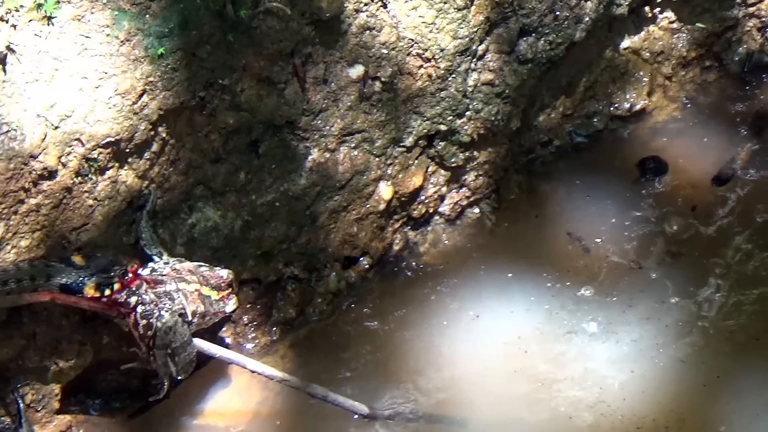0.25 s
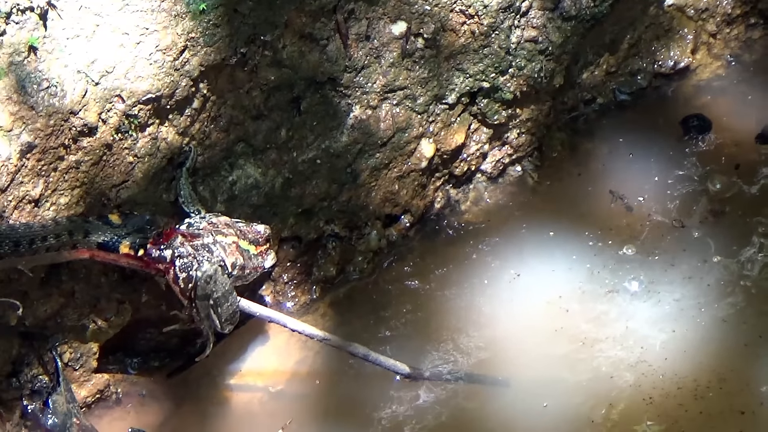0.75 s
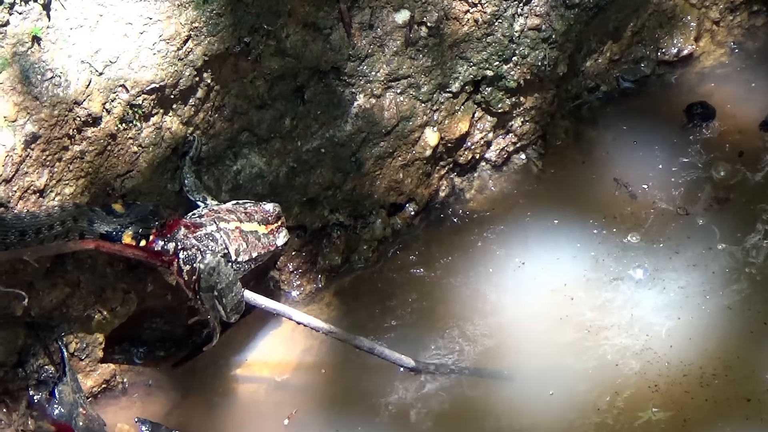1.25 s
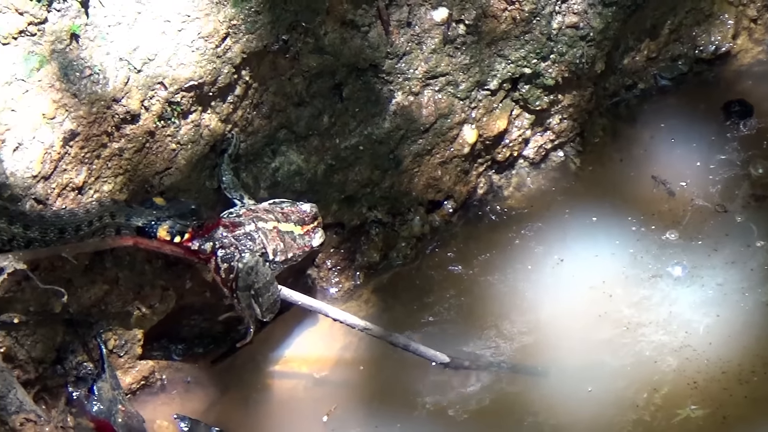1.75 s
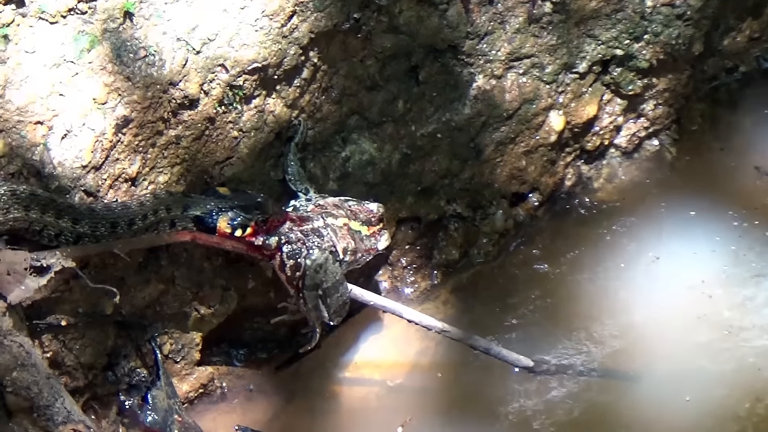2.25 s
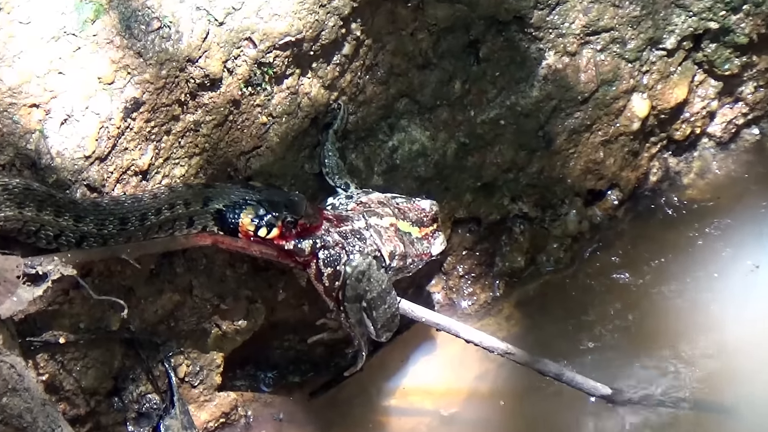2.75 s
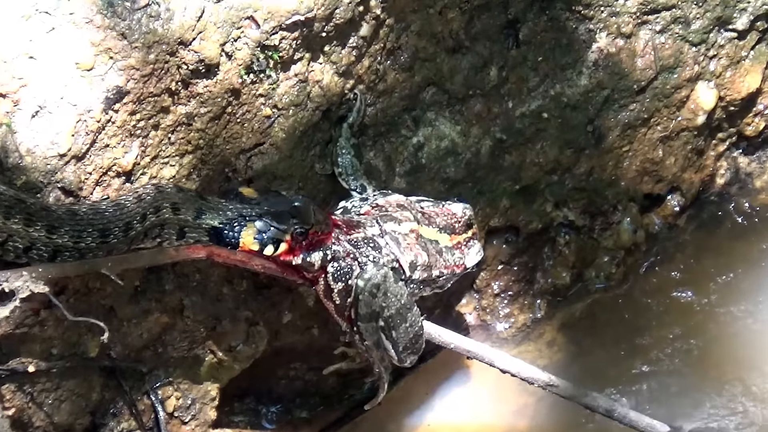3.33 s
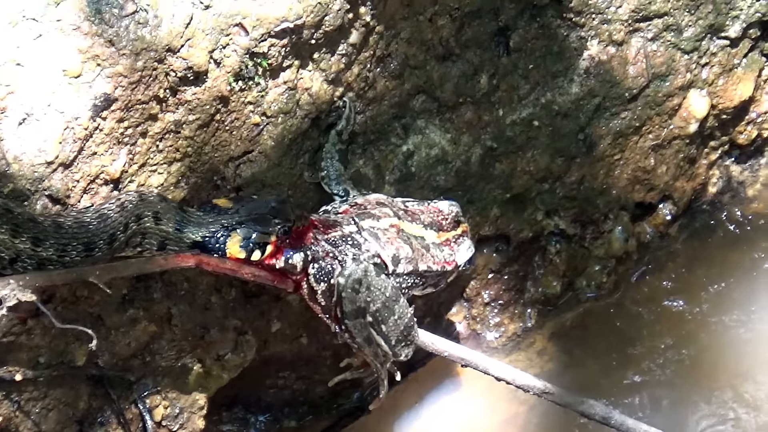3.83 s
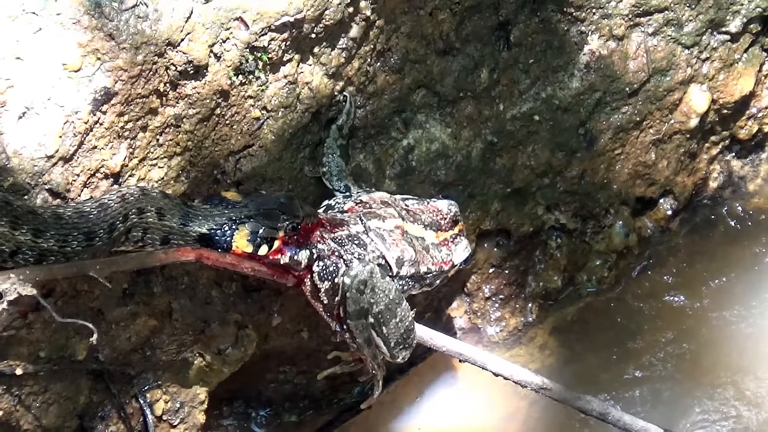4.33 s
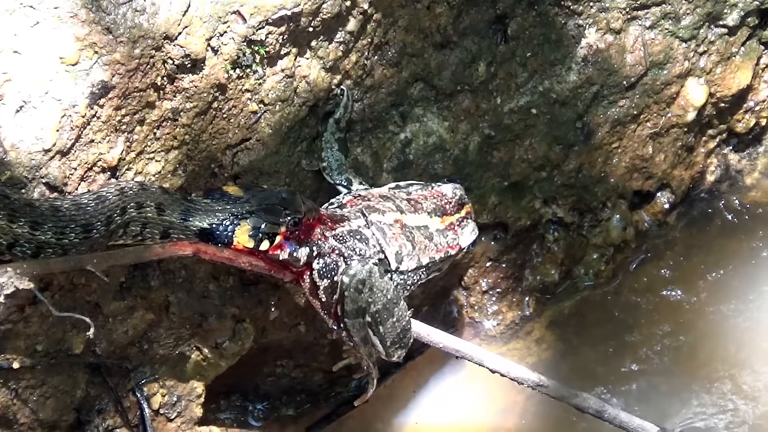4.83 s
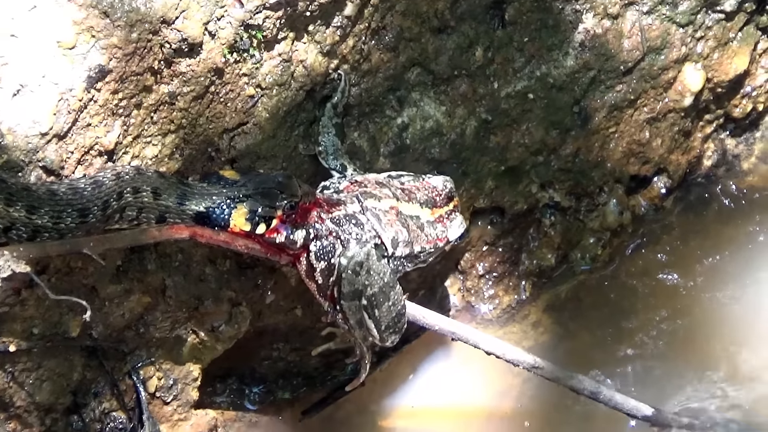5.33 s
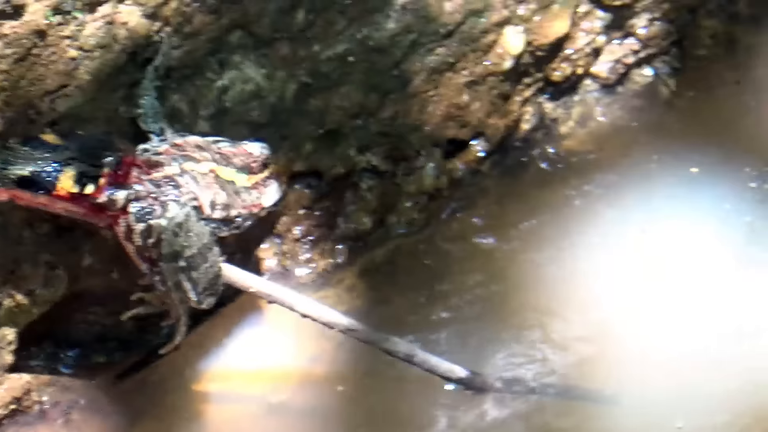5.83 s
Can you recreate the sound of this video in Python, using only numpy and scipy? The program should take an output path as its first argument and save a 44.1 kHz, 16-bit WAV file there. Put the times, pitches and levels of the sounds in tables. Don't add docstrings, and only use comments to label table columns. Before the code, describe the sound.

Two short, rasping frog cries over soft woodland hiss and far road drone, a few dry rustles, then loud finger clicks on the camera.

```python
import sys
import numpy as np
from scipy import signal
from scipy.fft import irfft
from scipy.io import wavfile

SR = 44100
rng = np.random.default_rng(int(sys.argv[2]) if len(sys.argv) > 2 else 0)


def store_pcm(level_fs):
    pcm = np.round(np.clip(level_fs, -1, 1) * 32767).astype(np.int16)
    wavfile.write(sys.argv[1], SR, np.atleast_2d(pcm).T)


def gain_from_decibels(decibels):
    exponent = np.asarray(decibels, float) / 20
    return 10 ** exponent


N = 268304
TIME = np.arange(N) / SR


def rms_one(x):
    return x / np.sqrt(np.mean(x ** 2) + 1e-20)


def at_hz(points, hz):
    points_hz, values = np.transpose(points)
    return np.interp(np.log(hz), np.log(points_hz), values)


def drift(rate_hz):
    r = np.exp(-80 * np.pi * rate_hz / SR)
    white = rng.standard_normal(N // 40 + 2002)
    slow = signal.lfilter([1], [1, -2 * r, r * r], white)[2000:]
    return np.interp(np.arange(N) / 40, np.arange(len(slow)), rms_one(slow))


def band(x, low_hz, high_hz, order=2):
    edges = [low_hz, min(high_hz, .45 * SR)]
    return signal.sosfilt(signal.butter(order, edges, "band", fs=SR, output="sos"), x)


def modes(table, hz):
    return sum(gain_from_decibels(db) * 1j * hz * width / (top ** 2 - hz ** 2 + 1j * hz * width) for top, width, db in table)


def add(out, s, sound):
    i = int(s * SR)
    out[..., i:i + sound.shape[-1]] += sound[..., :N - i]


# f/Hz, likeness/0..1
LIKENESS = [(60, 1.0), (130, 1.0), (290, 0.99), (640, 0.73), (1410, 0.44), (3100, 0.56), (6820, 0.77),
            (15000, 1.0)]


def banded_noise(spectrum, patchy_db, order):
    out, white = 0, rng.standard_normal((2, 2, N))
    edges = np.geomspace(spectrum[0][0], spectrum[-1][0], 18)
    for k, (low, high) in enumerate(zip(edges, edges[1:])):
        mid, side = band(white[k % 2], low, high, order=order)
        hz = np.sqrt(low * high)
        alike = np.clip(at_hz(LIKENESS, hz), 0, 1)
        gain = gain_from_decibels(at_hz(spectrum, hz) + patchy_db * drift(4.0))
        out = out + gain * (np.sqrt(1 + alike) * mid + np.sqrt(1 - alike) * side * [[1], [-1]])
    return rms_one(out)


# f/Hz, level/dB per Hz
HISS = [(400, -5.5), (650, 2), (1050, -0.5), (1500, -3.5), (3000, -6), (5500, -12.5), (7000, -14.5),
        (8700, -8.5), (10500, -19), (13000, -21.5), (16500, -19)]


def forest_hiss():
    start_db, fade_db_per_s = -57.5, 0.33
    top = signal.cheby2(16, 50, 16100, fs=SR, output="sos")
    hiss = signal.sosfilt(top, banded_noise(HISS, patchy_db=0.9, order=2))
    return gain_from_decibels(start_db - fade_db_per_s * TIME + np.array([[.35], [-.35]])) * hiss


def swells(rows):
    return sum(gain_from_decibels(db - 11.5 * ((TIME - s) / half) ** 2) for s, db, half in rows)


# f/Hz, level/dB per Hz
RUMBLE = [(20, -36), (60, -15), (105, -21.5), (125, -3.5), (165, 2), (250, -5.5), (340, -2.5), (420, -12.5),
          (520, -21)]
# t/s, level/dB
TRAFFIC = [(0.0, -55), (0.8, -62.5), (1.25, -55.5), (1.55, -59), (1.85, -54), (3.0, -58.5), (3.9, -60),
           (4.6, -57.5), (6.08, -60.5)]
# t/s, level/dB, half length/s
LOW_ENGINE = [(0.0, -61, 0.076), (1.37, -51, 0.13), (1.85, -47.5, 0.14), (2.3, -46, 0.33),
              (4.15, -57.5, 0.31), (5.72, -56, 0.069)]
HIGH_ENGINE = [(0.1, -64, 0.66), (1.0, -56, 0.54), (1.78, -56, 0.17), (2.78, -57.5, 0.44),
               (4.2, -59.5, 0.54), (4.78, -59, .12), (5.2, -64, 0.26)]


def traffic():
    rumble = gain_from_decibels(np.interp(TIME, *np.transpose(TRAFFIC)) - 3.5) * banded_noise(RUMBLE, patchy_db=2.0, order=3)
    white = rng.standard_normal((2, N))
    low_drone = gain_from_decibels(-10.0) * swells(LOW_ENGINE) * rms_one(band(white[0], 170.4, 210.4))
    high_drone = gain_from_decibels(-5.0) * swells(HIGH_ENGINE) * rms_one(band(white[1], 281, 361.0))
    return rumble + low_drone + high_drone


# t/s, level/dB, hold/s, t60/s, dull part level/dB
RUSTLES = [
    (0.068, -63, .006, .03, -27),
    (0.566, -60, .011, .04, -20),
    (2.34, -35.5, 0.0088, 0.074, -19),
    (2.653, -45, 0.021, 0.061, -10.5),
    (2.915, -54.5, 0.01, .03, -16),
    (2.934, -47, 0.013, 0.065, -6.5),
    (3.813, -60, 0.012, .032, -8),
    (5.469, -42.5, 0.0014, 0.013, 2),
    (6.018, -45, .007, 0.047, 1),
]


def rustles():
    grains = rng.standard_normal((2, N)) * gain_from_decibels(2.2 * drift(500))
    grains = grains[0] + 0.32 * grains[1] * np.array([[1], [-1]])
    bright = rms_one(band(grains, 7400, 10000) + 0.24 * band(grains, 5700, 11700))
    dull = rms_one(band(grains, 1030, 2600) + 1.46 * band(grains, 4400, 4740))
    out, rise_s = 0, 0.0027
    for s, db, hold, t60, dull_db in RUSTLES:
        rise = np.clip((TIME - s) / rise_s, 0, 1)
        fall_db = -60 * np.clip(TIME - s - rise_s - hold, 0, 1) / t60
        out = out + rise * gain_from_decibels(db + fall_db) * (bright + gain_from_decibels(dull_db) * dull)
    return out


# t/s, peak level/dB, ring f/Hz, brightness/dB
TICKS = [(0.203, -37, 870, -3), (0.448, -41, 1800, 0), (0.505, -42.5, 1170, 6.5), (0.514, -34.5, 1100, -20),
         (0.559, -37.5, 7540, 7.5), (0.962, -38, 1080, -22), (1.995, -35, 1920, -8),
         (2.518, -43.5, 9150, 14), (2.529, -41, 6900, 13), (2.534, -46, 3340, 5), (3.342, -22.5, 1560, -11),
         (3.491, -34.5, 3380, -21), (4.296, -35, 925, -40), (4.56, -48.5, 991, 7), (5.31, -39, 860, -3)]
# t/s, peak level/dB, ring f/Hz, brightness/dB
CLICKS = [(5.431, -42.5, 896, 0), (5.446, -28.5, 2780, -0.5), (5.473, -17, 1930, -11),
          (5.508, -23.5, 1070, -24), (5.512, -28, 1040, -14), (5.523, -23, 1200, -5.5),
          (5.55, -32.5, 1050, -41), (5.622, -51, 993, 9.5), (5.742, -24.5, 3030, -18),
          (5.773, -10.5, 3360, 0.5), (5.806, -29.5, 1180, -10), (5.866, -26, 3370, 0),
          (5.871, -8, 897, -8.5), (5.872, -21.5, 633, -40), (5.885, -11, 1900, -6.5),
          (5.95, -16.5, 1340, 2), (5.988, -19.5, 3380, -1), (6.016, -19, 8900, 9.5), (6.021, -14, 7500, 6),
          (6.023, -11.5, 8500, -35), (6.027, -21.5, 6760, 4), (6.052, -24.5, 1230, -16),
          (5.7749, -8.5, 13400, -60)]


def clicks():
    knocks = TICKS + CLICKS
    out, t = np.zeros((2, N)), np.arange(2000) / SR
    noise = rng.standard_normal((len(knocks), 3, len(t)))
    for (s, db, hz, bright_db), (centre, sharp, side) in zip(knocks, noise):
        octaves = np.log2(hz / 1000)
        t60 = 0.018 - 0.0023 * octaves
        low_db = db - 14.5 - 6.5 * octaves
        high_db = db + bright_db
        blow = np.minimum(t / .0004, 1) * (gain_from_decibels(-60 * t / t60) + gain_from_decibels(-26 - 60 * t / (3.0 * t60)))
        crackle = (centre + .3 * side * np.array([[1], [-1]])) * blow
        ring = np.sin(2 * np.pi * hz * t * (1.05 - 18 * t))
        ring = ring * np.minimum(t / .001, 1) * gain_from_decibels(db - 8 - 60 * 1.3 ** octaves * t / t60)
        low = band(crackle, 850, 2590) * gain_from_decibels(low_db + 11.0)
        middle = band(crackle, 1490, 4950) * gain_from_decibels(db - 8.5 + 0.16 * bright_db)
        high = band(sharp * blow ** 2.9, 6300, 10300, order=3)
        shrill = gain_from_decibels(0.79 * db - 11.0) * band(sharp * blow ** 6.0, 13000, 15100)
        add(out, s, ring + low + middle + (high + shrill) * gain_from_decibels(high_db))
    return out


def snap_times(pace):
    s, per_s = np.transpose(pace)
    t = np.arange(s[0], s[-1] + .003, 1 / SR)
    turns = np.cumsum(np.exp(np.interp(t, s, np.log(per_s)))) / SR
    return np.interp(np.arange(int(turns[-1]) + 1), turns, t)


# t/s, snap rate/per s
PACES = [
    [(1.1431, 81.4), (1.1693, 143.1), (1.264, 250.1), (1.322, 120.8), (1.4673, 52.9), (1.6068, 43.6),
     (1.6729, 64.3), (1.7103, 176.0), (1.77, 84.9)],
    [(4.5982, 65.2), (4.6408, 135.9), (4.6899, 192.8), (4.8667, 74.4), (5.0012, 56.2), (5.063, 97.4),
     (5.0889, 179.5), (5.1757, 56.3), (5.185, 166.7)],
]
# t/s, mouth resonance f/Hz, effort level/dB
MOUTHS = [
    [(1.143, 4800, -33.5), (1.18, 5830, -30), (1.27, 6630, -25.5), (1.43, 6070, -30.5), (1.6, 5040, -29),
     (1.68, 4300, -28), (1.705, 3900, -29.5), (1.73, 2310, -35.5), (1.77, 1410, -36.5)],
    [(4.597, 5500, -30.5), (4.63, 5940, -29), (4.69, 6020, -26), (4.75, 5770, -27.5), (4.9, 4920, -30.5),
     (5.06, 4320, -31), (5.09, 3370, -35.5), (5.126, 2000, -36.5), (5.185, 1270, -46.5)],
]
# settled body share/dB, upper share/dB, rise of the upper resonance/Hz
POSTURES = [
    (-4.5, -10, 2),
    (-1, 9.5, 298),
]
# mouth f/Hz, upper f/Hz, share/dB
UPPER = [(1300, 1700, -23), (2230, 4200, 1.5), (3520, 4200, 4), (4540, 5250, -11.5), (6790, 8770, -9)]
# t/s, length/s, snap rate/per s, mouth f/Hz, effort level/dB
CROAKS = [
    (1.1185, .0155, 155.0, 1860, -44),
    (4.531, .019, 128.0, 1950, -46),
    (1.788, .023, 88.0, 1300, -44),
]


def voice():
    settle_s, body_start_db, upper_start_db = 0.17, -7.5, -11.5
    rows, (mouths, uppers, shares) = [], np.transpose(UPPER)
    for pace, mouth, (body_db, upper_db, raised_hz) in zip(PACES, MOUTHS, POSTURES):
        at, (s, mouth_hz, effort_db) = snap_times(pace), np.transpose(mouth)
        hz = np.interp(at, s, mouth_hz)
        early = np.exp(-(at - at[0]) / settle_s)
        shut = np.clip((4740 - hz) / 1530, 0, 1)
        upper_hz = np.interp(hz, mouths, uppers) + raised_hz * (1 - shut)
        body_share = body_db + body_start_db * early + 8.5 * shut
        upper_share = upper_db * (1 - shut) + upper_start_db * early + np.interp(hz, mouths, shares)
        rows.append([at, hz, upper_hz, np.interp(at, s, effort_db), body_share, upper_share])
    for s, length, per_s, hz, db in CROAKS:
        at = snap_times([(s, per_s), (s + length, per_s)])
        steady = (hz, np.interp(hz, mouths, uppers), db, 3.0, -25)
        rows.append([at] + [np.full(len(at), value) for value in steady])
    return np.concatenate(rows, axis=1)


def mouth_response(hz, mouth_hz, upper_hz, upper_db, wobble):
    u = 1j * hz / (mouth_hz * (1 + .012 * wobble))
    notches = (1 + u / 30 + u ** 2 / 1.178 ** 2) * (1 + u / 12 + u ** 2 / 1.86 ** 2)
    main_peak = 1 + u / (6.56 * mouth_hz / 5500) + u ** 2
    mouth = notches / main_peak / (1 + u / 1.6 + u ** 2 / 1.184 ** 2) / (1 + u / 1.29 + u ** 2 / 1.23 ** 2)
    shoulder = modes([(0.96 * mouth_hz, 220, 2.0)], hz)
    return mouth + shoulder + modes([(upper_hz, 0.17 * upper_hz, upper_db / 2)], hz) ** 2


def shrill_response(hz, mouth_hz):
    squeak_hz = 12950 - .8 * np.clip(4300 - mouth_hz, 0, 1600)
    shrill = modes([(11900, 700, -17), (squeak_hz, 800, -10), (14200, 600, -17)], hz) ** 2
    return shrill / (1 + (hz / 15000) ** 12) / (1 + (2200 / mouth_hz) ** 4)


# f/Hz, width/Hz, level/dB
HEAD = [(4300, 850, -8.5), (5500, 2100, -3), (7240, 800, -34), (8500, 390, -10), (9150, 134, 2),
        (10200, 150, -2), (10900, 300, -4)]
BODY = [(1110, 135, 5.5), (1740, 480, 1), (2570, 300, -8), (3200, 450, -8), (3550, 250, -11)]
# f/Hz, width/Hz, depth/dB
VALLEYS = [(1450, 140, -2.5), (2280, 220, -6), (3760, 200, -14)]


def frog():
    at, *controls = voice()
    mouth_hz, upper_hz, snap_db, body_db, upper_db = (c[:, None] for c in controls)
    chance = rng.standard_normal((len(at), 3))
    hz = np.fft.rfftfreq(1024, 1 / SR)
    mouth = mouth_response(hz, mouth_hz, upper_hz, upper_db, chance[:, :1])
    answers_later = np.exp(-2j * np.pi * hz * 0.00021)
    body = gain_from_decibels(body_db + 0.56 * chance[:, 1:2]) * modes(BODY, hz) * answers_later
    low, high = 1j * hz / 3950, 1j * hz / 10700
    head = modes(HEAD, hz) * low ** 2 / (1 + low / 1.34 + low ** 2) / (1 + high / 1.32 + high ** 2) ** 2
    v = 1j * hz / 1060
    radiation = (v ** 2 / (1 + v / 1.2 + v ** 2)) ** 3
    for middle, width, db in VALLEYS:
        radiation = radiation * (1 - (1 - gain_from_decibels(db)) * modes([(middle, width, 0)], hz))
    lead = np.exp(-2j * np.pi * hz * .001)
    effort = gain_from_decibels(snap_db + 21.5 + 0.14 * chance[:, 2:])
    snaps = irfft(effort * radiation * lead * (mouth * (head + body) + shrill_response(hz, mouth_hz)))
    out = np.zeros(N)
    for s, snap in zip(at - .00112 + .00006 * chance[:, 1], snaps):
        add(out, s, snap)
    return out


# delay t/s, level/dB
MUD_ECHOES = [(.0014, -23), (.0024, -18), (.0033, -21), (.0047, -25)]


def pool_edge(x):
    scatter_t60_s, forest_t60_s = .055, 0.61
    t = np.arange(12000) / SR
    scatter = rng.standard_normal((2, len(t))) * gain_from_decibels(-32.5 - 60 * t / scatter_t60_s)
    trees = band(rng.standard_normal((2, len(t))), 1300, 5000, order=1) * gain_from_decibels(-52.5 - 60 * t / forest_t60_s)
    tail = scatter * (t > .001) + trees * (t > .01)
    tail[:, 0] = gain_from_decibels(np.array([.4, -.4]))
    for delay, db in MUD_ECHOES:
        tail[:, round(delay * SR)] += gain_from_decibels(db)
    return signal.fftconvolve(x[None], tail, axes=1)[:, :N]


def scene():
    return forest_hiss() + traffic() + rustles() + clicks() + pool_edge(frog())


def low_pass(x):
    return signal.sosfilt(signal.butter(12, 16830, fs=SR, output="sos"), x)


def record(dry):
    heard = signal.sosfilt(signal.cheby2(10, 40, 17000, fs=SR, output="sos"), dry)
    return low_pass(heard)


dry = scene()
out = record(dry)
store_pcm(out)
```